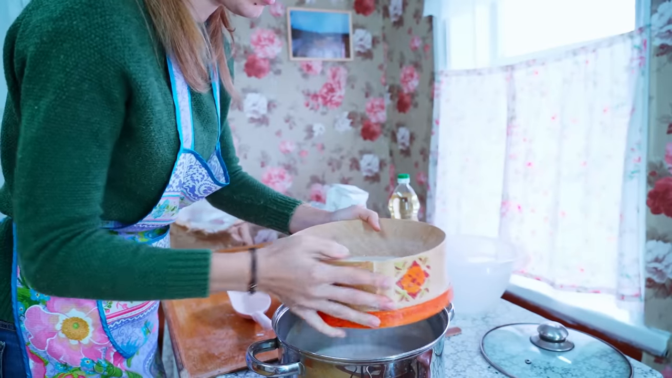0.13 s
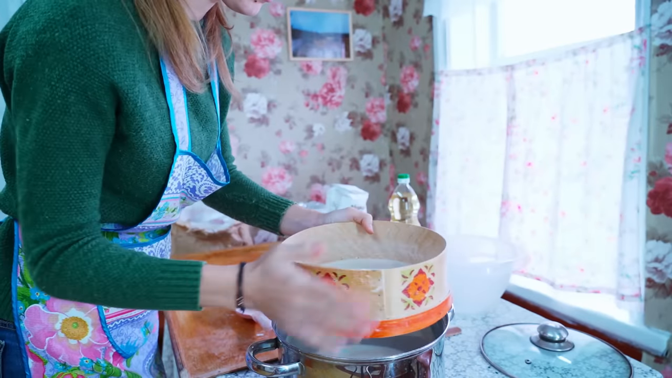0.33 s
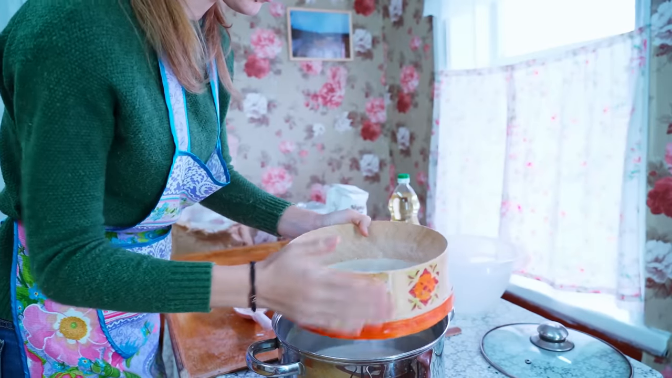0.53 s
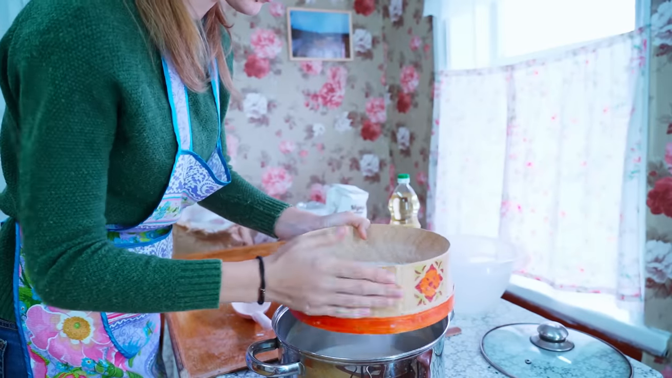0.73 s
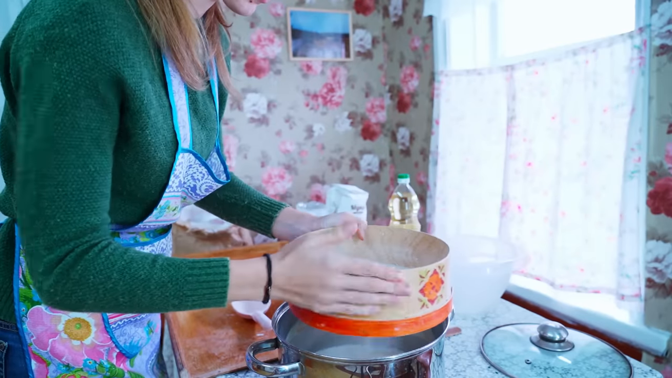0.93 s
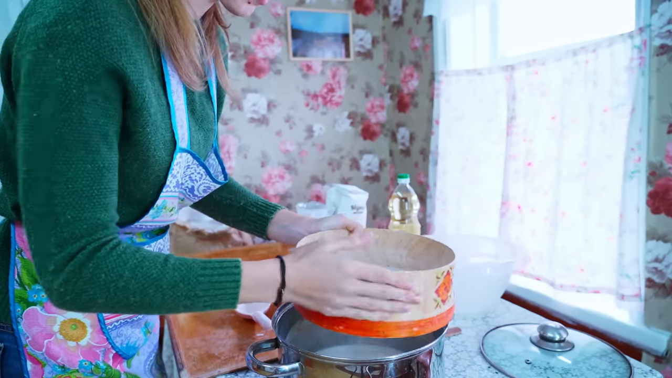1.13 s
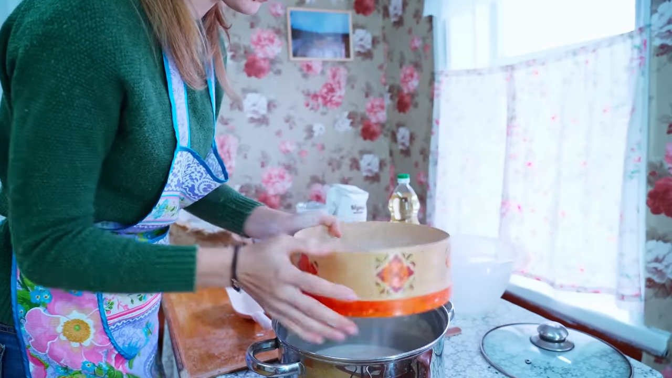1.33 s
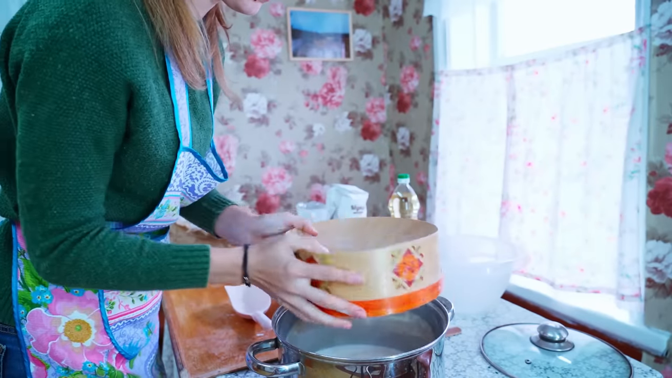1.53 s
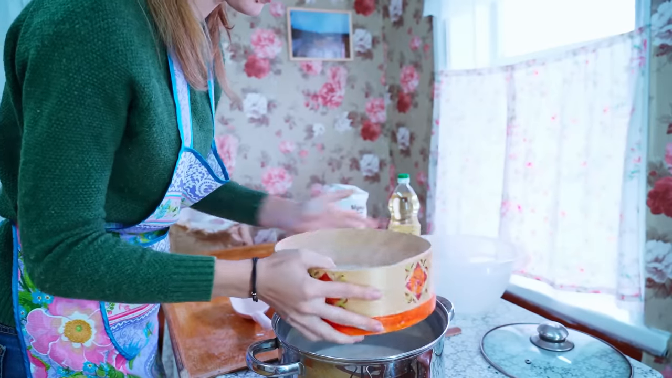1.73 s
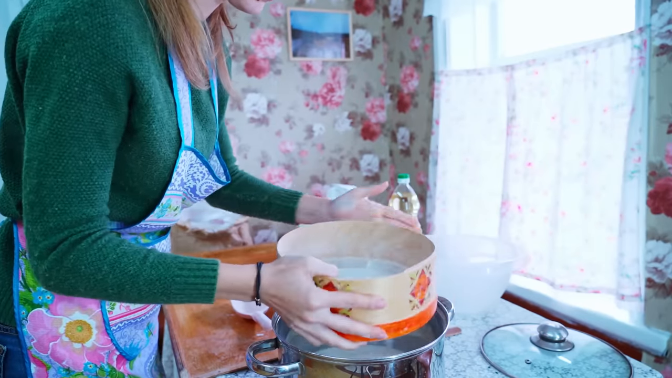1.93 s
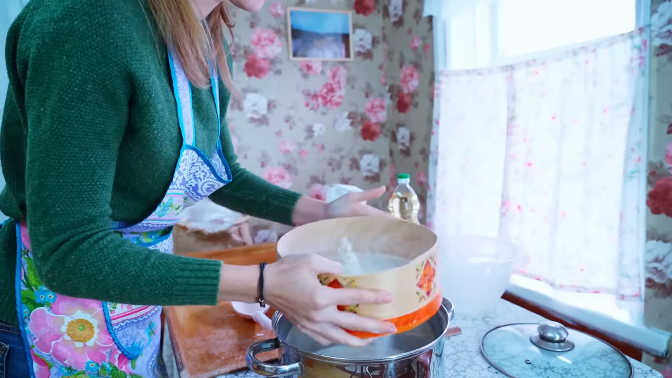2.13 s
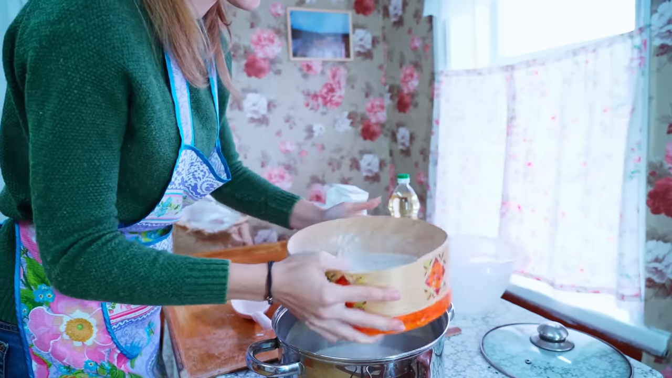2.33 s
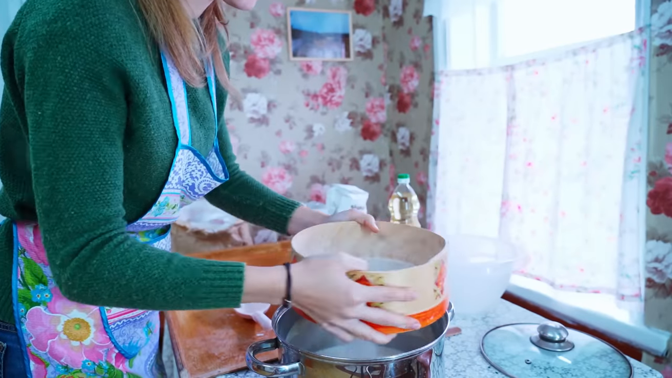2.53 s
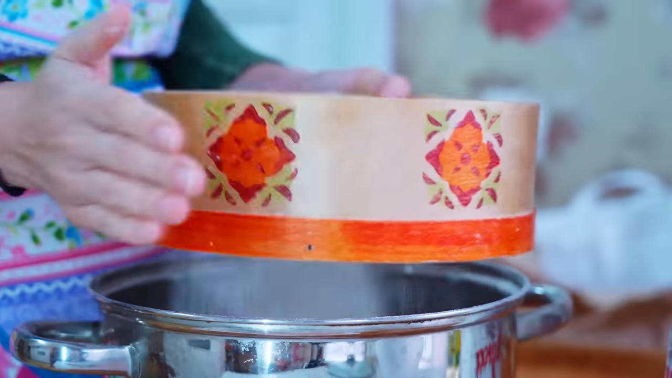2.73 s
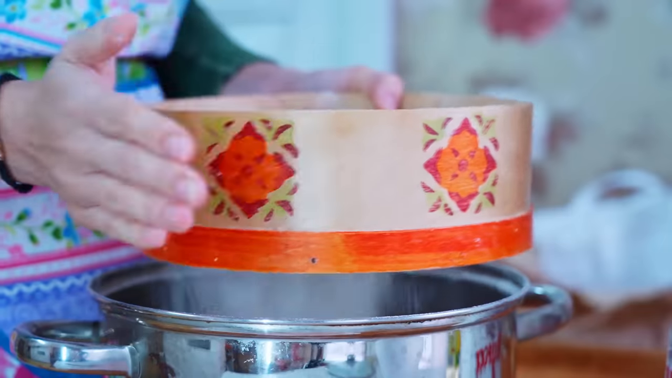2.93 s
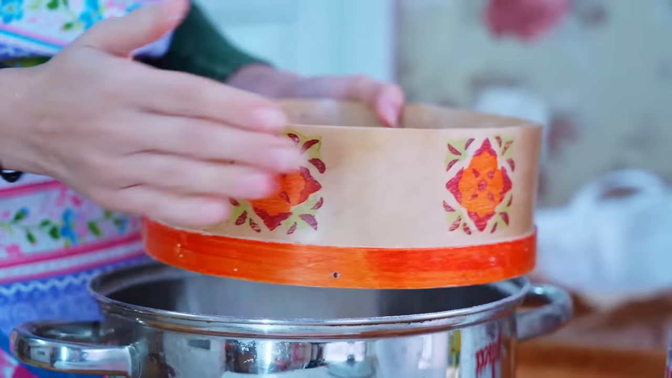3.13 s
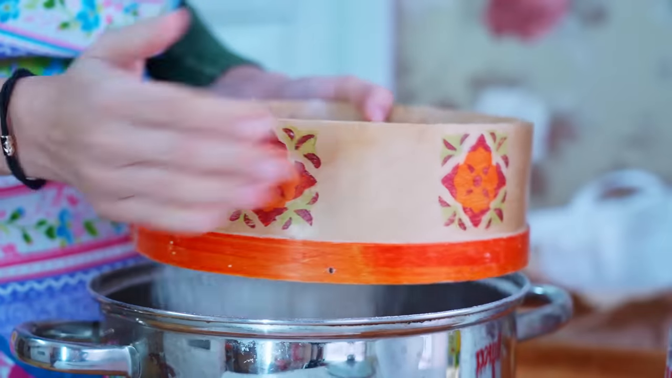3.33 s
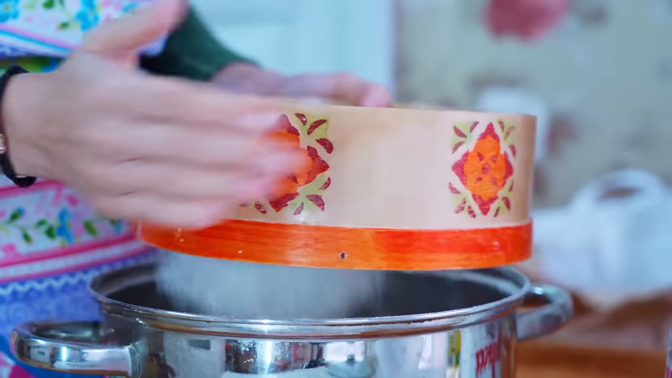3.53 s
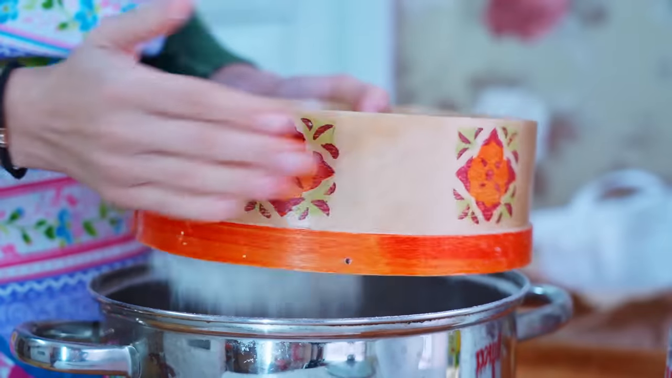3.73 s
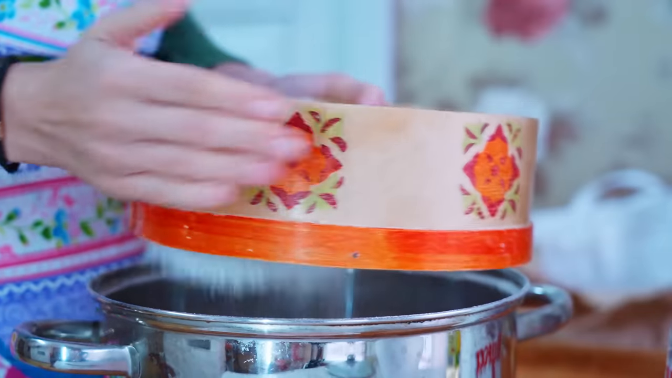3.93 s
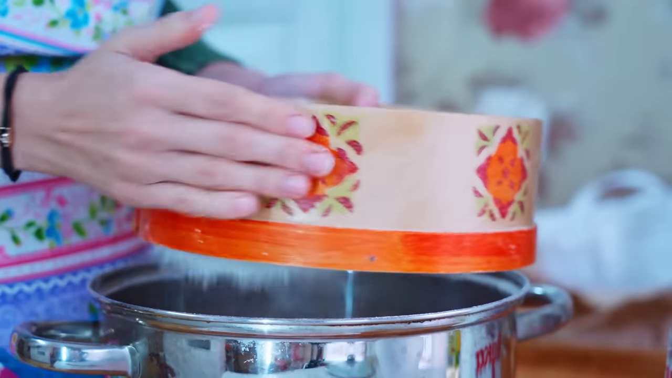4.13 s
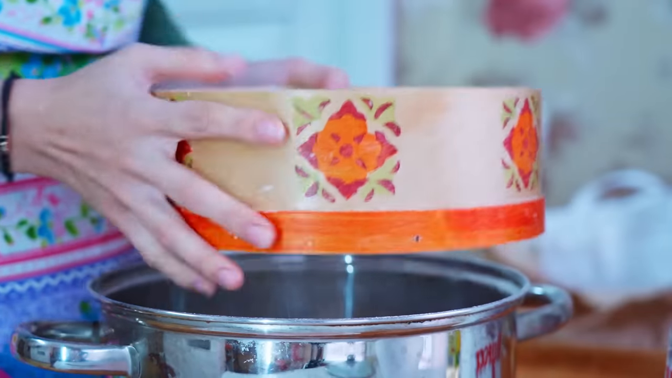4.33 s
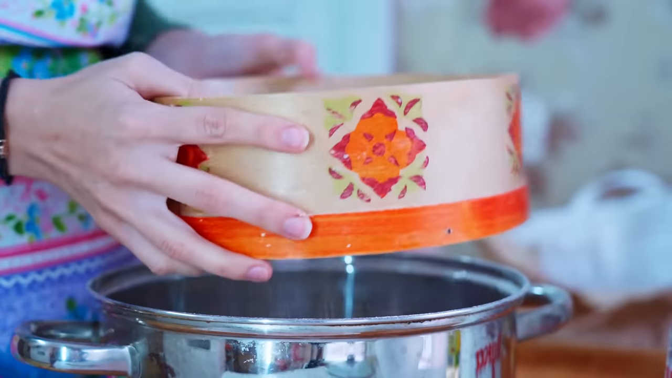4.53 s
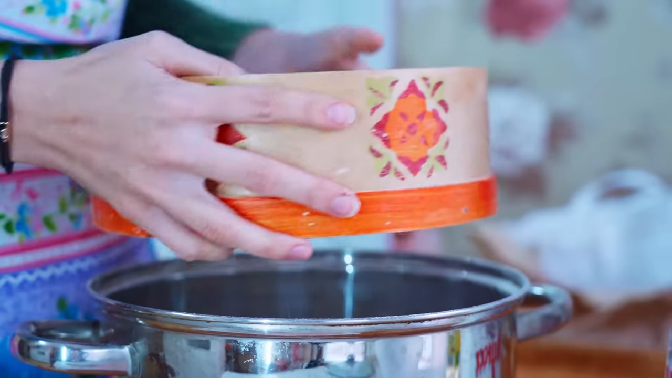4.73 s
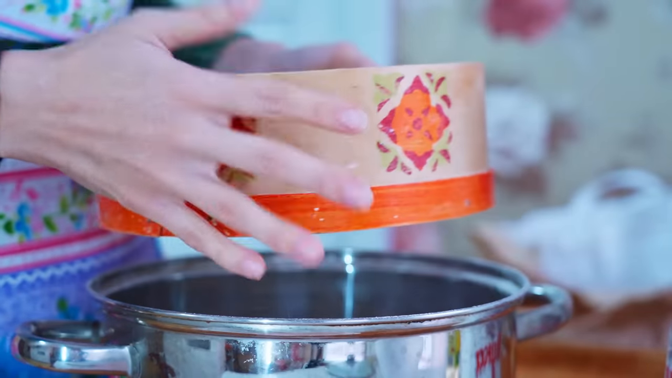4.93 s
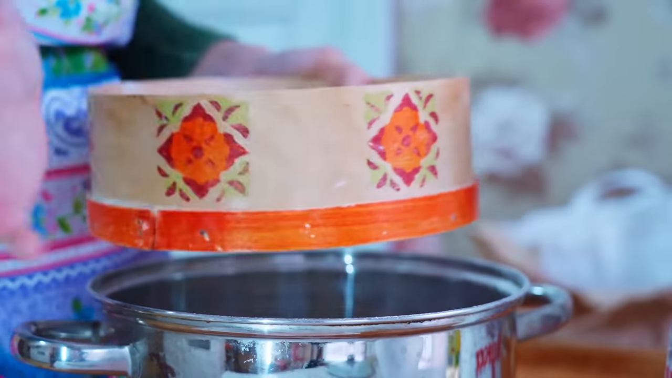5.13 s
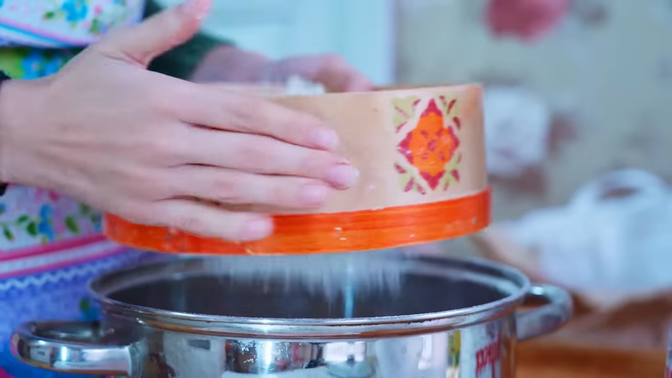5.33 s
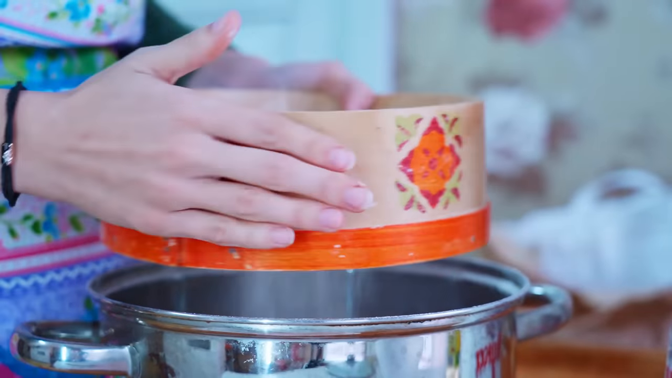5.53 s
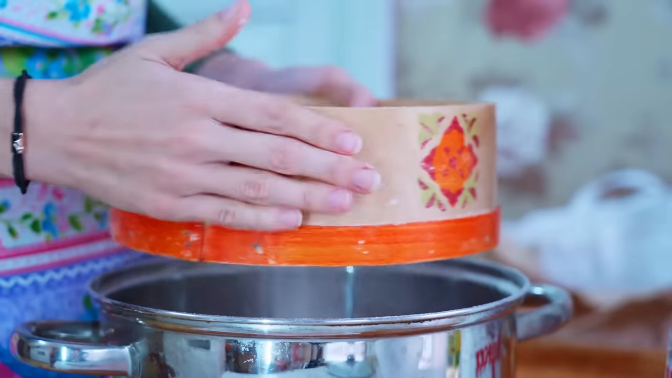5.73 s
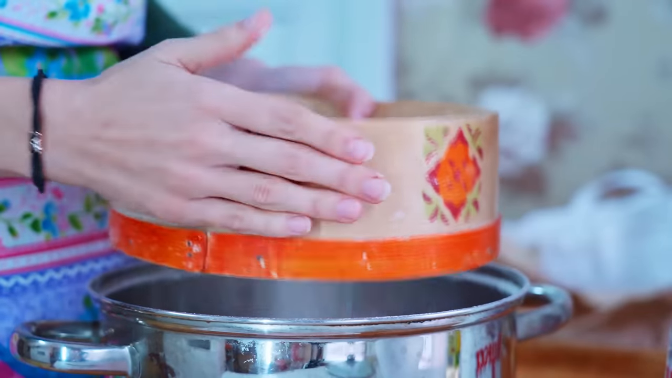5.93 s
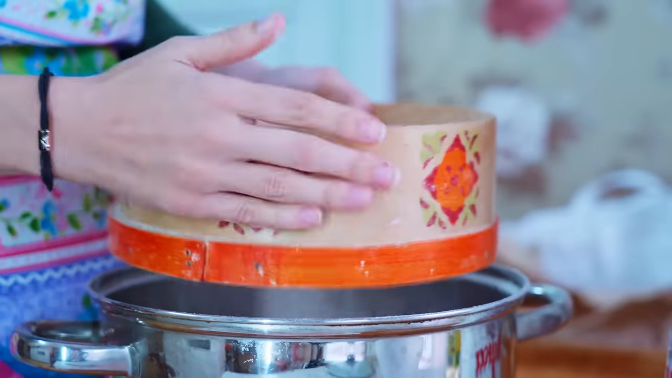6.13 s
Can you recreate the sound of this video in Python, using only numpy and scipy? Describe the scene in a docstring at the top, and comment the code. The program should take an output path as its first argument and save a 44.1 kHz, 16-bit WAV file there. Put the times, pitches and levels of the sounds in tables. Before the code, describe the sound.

A hand pats the wooden hoop of a flour sieve in three quick, even runs, hollow dry knocks in a small lively kitchen.

```python
"""A hand pats the wooden hoop of a flour sieve over a steel pot in a small kitchen, about five times a second in three runs.
Each pat is noise shaped by the contact of the hand: a clack of the hoop, a hollow pock of air under the palm,
a snap of skin with a short hiss of flour, and ringing modes of the wood and the loaded mesh.
During and between the runs skin rubs on the wood, fingertips tick and flour flops on the mesh.
Dense echoes of table and walls surround it all, over a faint rumble and hiss of the room."""
import sys
import numpy as np
from scipy import signal
from scipy.fft import rfft, irfft
from scipy.io import wavfile

SR = 44100
rng = np.random.default_rng(int(sys.argv[2]) if len(sys.argv) > 2 else 0)


def master(y):
    """Save y as 16-bit WAV."""
    cut = np.clip(np.atleast_2d(y).T, -1, 1)
    pcm = np.round(cut * 32767)  # scale
    wavfile.write(sys.argv[1], SR, pcm.astype(np.int16))


N = 272538  # length of the scene in samples
AGE = np.arange(SR // 2) / SR  # seconds since the start of a blow
SIZE = 2 ** 15  # samples in a filter design

FIRM_DB = -21.5  # strength of a firm pat
BASS_FOLLOWS = 0.76  # dB of bass per dB of strength: a softer pat loses less bass than clack
# Each pair: flat fingers, hollow palm. The palm traps air, lands slowly, pushes the mesh and damps the wood.
POCK_DB = (-15.5, -1)  # against the strength
BOOM_DB = (-47, -37.5)  # at a firm pat
ECHO_DB = (4, -4.5)

# Pats of the hand on the hoop. Each row: start in seconds, strength in dB, cupping from 0 (flat fingers)
# to 1 (hollow palm), skin snap in dB against the strength, pitch of the pock in Hz, pitch of the clack in Hz.
HAND_PATS = [(0.032, -38, 0.72, -13, 363, 3000), (0.4104, -23, 0.66, -6, 507, 1890),
             (0.596, -21.5, 0.48, -4, 458, 2900), (0.7694, -20, .05, -8, 570, 1560),
             (0.9502, -18.5, 0.34, -10, 328, 2130), (1.137, -20, 0.22, -3.5, 457, 2470),
             (1.873, -29.5, 0.26, -6, 785, 2660), (2.0472, -27.5, 0.51, 0, 330, 3350),
             (2.218, -23.5, 0.36, -4.5, 414, 3020), (2.3914, -23.5, 0.5, -4.5, 490, 2640),
             (2.635, -22, 0.073, -5, 404, 2500), (2.8406, -21, 0.48, -6, 620, 2090),
             (3.0458, -20, 0.44, -14.5, 630, 2500), (3.267, -21.5, 0.46, -8, 468, 1890),
             (3.4684, -21, 0.57, -7.5, 640, 2050), (3.682, -20, 0.78, -9, 420, 1900),
             (3.8896, -21.5, 0.72, -4.5, 392, 1490), (4.1083, -21, 0.51, -11, 625, 2300),
             (4.373, -40, 0.37, -5.5, 380, 2500), (5.3045, -19, 0.39, -4.5, 407, 2500),
             (5.5363, -24, 0.57, -7.5, 435, 2100), (5.7453, -23, 0.53, -6, 413, 1380),
             (5.9597, -23.5, 1, -8, 400, 2000), (6.1675, -21, 0.64, -11, 442, 2320)]
# Thump of the loaded mesh at a firm pat, as it changes along the scene. Each row: time in seconds, level in dB.
MESH_THUMP_LEVEL = [(0, -28.5), (.42, -25.5), (.8, -36), (1.15, -38), (2.07, -30), (3.05, -40), (3.7, -43),
                    (4.1, -36), (5.3, -33.5), (5.95, -31), (6.17, -37.5)]


def pats():
    """The hand strikes the hoop: the wood clacks, trapped air pocks, the mesh thumps and flour is jolted across it."""
    out = np.zeros((2, N))
    snap_colour = causal(SKIN_SNAP_COLOUR)
    for start_s, clack_db, cupping, snap_db, pock_hz, clack_hz in HAND_PATS:
        pock_db = clack_db + by_hand(POCK_DB, cupping)
        bass_db = BASS_FOLLOWS * (clack_db - FIRM_DB)
        thump_db = bass_db + np.interp(start_s, *np.transpose(MESH_THUMP_LEVEL))
        boom_db = bass_db + by_hand(BOOM_DB, cupping)

        force = blow(clack_db, cupping)
        room = from_db(by_hand(ECHO_DB, cupping)) * echoes()
        # the blow is so brief that the room answers it as one click
        tail = room * np.sqrt(np.sum(force ** 2) / 2)

        hollow = from_db(pock_db) * pock(force, tail, pock_hz)
        wood = from_db(clack_db) * clack(force, tail, clack_hz, cupping)
        skin = from_db(clack_db + snap_db) * snap(force, tail, snap_colour)
        add(out, start_s, hollow + wood + skin)
        add(out, start_s, in_room(hoop(pock_db, pock_hz, clack_db, clack_hz), room))
        add(out, start_s, from_db(thump_db) * unit_start(in_room(thud(), room)))
        add(out, start_s, from_db(boom_db) * boom())
    return out


# Settings of the contact; the pair is for flat fingers and a hollow palm.
CONTACT_S = (0.0012, 0.0072)  # decay of the push at a firm pat
CONTACT_DOUBLES_DB = 11  # a pat this much softer lands twice as slowly
FINGERS_LAG_CONTACTS, FINGERS_DB = 0.69, -15.5  # lag behind the palm in contact times, level against it
CRACK_DB, CRACK_FOLLOWS = 12, .9  # crack at a firm pat against the palm's noise, dB per dB of strength


def blow(clack_db, cupping, settle_db=-19, settle_s=.016, crack_s=.0004):
    """Skin meets wood with one sharp crack, palm and fingers land in turn, then the hand settles."""
    softer_db = FIRM_DB - clack_db
    contact_s = by_hand(CONTACT_S, cupping) * 2 ** (softer_db / CONTACT_DOUBLES_DB)
    lag_s = FINGERS_LAG_CONTACTS * contact_s
    palm = np.exp(-AGE / contact_s)
    fingers = from_db(FINGERS_DB) * (AGE >= lag_s) * np.exp(-np.abs(AGE - lag_s) / contact_s)
    settle = from_db(settle_db) * np.exp(-AGE / settle_s)
    push = stereo_noise(size=len(AGE)) * (palm + fingers + settle)
    crack = signal.unit_impulse(len(AGE), int(crack_s * SR))
    return push + from_db(CRACK_DB - CRACK_FOLLOWS * softer_db) * crack


# Colour of the clack of the wood. Each row: frequency in Hz, relative level in dB.
CLACK_COLOUR = [(60, -101.5), (300, -92), (700, -41), (1050, -5.5), (1400, -3.5), (2300, 0), (3200, -2.5),
                (4300, -1.5), (6000, -12), (12000, -29)]
RESONANCE_DB = (6.5, -5)  # of the struck spot: flat fingers, hollow palm
SPOT_IN_ECHO_DB = -3  # the struck spot faces the microphone, so its resonance is weaker in the echoes


def clack(force, tail, clack_hz, cupping, follow=0.057):
    """The struck spot of the hoop favours one pitch and pulls the whole colour of the wood slightly along."""
    colour = shifted(CLACK_COLOUR, (clack_hz / 2300) ** follow)
    direct = through(force * from_db([[-1.4], [1.1]]), colour)  # left, right
    echoed = through(tail, colour)
    knock = resonate(direct + from_db(SPOT_IN_ECHO_DB) * echoed, clack_hz, q=3.75)
    return unit_start(direct + echoed + from_db(by_hand(RESONANCE_DB, cupping)) * knock)


# Colour of the hollow pock. Each row: frequency in Hz, relative level in dB.
POCK_COLOUR = [(40, -64), (120, -52), (260, 3.5), (400, 8), (650, 3.5), (900, 5.5), (1400, -10),
               (4000, -54)]


def pock(force, tail, pock_hz, follow=0.052):
    """The air trapped under the palm rings briefly and pulls the whole colour of the pock slightly along."""
    colour = shifted(POCK_COLOUR, (pock_hz / 450) ** follow)
    push = through(force + 0.84 * tail, colour)
    return unit_start(push + 2.4 * resonate(push, pock_hz, q=7.0))


# Colour of skin snap and flour hiss, used by pats and ticks. Each row: frequency in Hz, relative level in dB.
SKIN_SNAP_COLOUR = [(100, -70), (1000, -19.5), (3200, -10), (4800, 4), (6500, 0), (8500, -5.5),
                    (11000, -11.5), (16000, -22.5)]


def snap(force, tail, colour, flour_db=-31, flour_s=0.083, grain_db=2.2):
    """Skin snaps on the wood, then jolted flour hisses: noise with a grainy level that dies away."""
    grains = from_db(flour_db + grain_db * rng.standard_normal(len(AGE)))
    flour = stereo_noise(size=len(AGE)) * grains * np.exp(-AGE / flour_s)
    skin = force * from_db([[-4.0], [2.2]])  # left, right
    return unit_start(through(skin + tail + flour, colour)) * from_db([[-.6], [.4]])


# Modes of the wooden hoop, damped by the hands. Each row: frequency in Hz, relative level in dB.
HOOP_MODES = [(352, -6), (418, 0), (490, -3), (618, 1), (823, -4), (952, -6), (1195, -1), (1395, 2),
              (1662, 0), (1855, 1), (2040, 0), (2330, -1), (2700, -2), (3201, -1), (3379, -1)]
HOOP_T60_S = .055


def hoop(pock_db, pock_hz, clack_db, clack_hz, per_octave_db=8, low_db=-13, high_db=-16.5):
    """Low modes follow the palm's push, high ones the sharp contact; those near the pitch of the spot ring most."""
    modes = []
    for hz, db in HOOP_MODES:
        if hz < 900:
            drive_db, spot_hz = pock_db + low_db, pock_hz
        else:
            drive_db, spot_hz = clack_db + high_db, clack_hz
        distance_octaves = abs(np.log2(hz / spot_hz))
        modes.append((hz, db + drive_db - per_octave_db * distance_octaves, HOOP_T60_S))
    return struck(modes, scatter_db=7.5)


# Higher modes of the mesh. Each row: frequency in Hz, relative level in dB, t60 in seconds.
MESH_MODES = [(117.6, -10.5, 0.19), (162, -3.5, 0.13), (203.5, 1.5, 0.055), (274, -2, 0.033)]


def thud(cut_hz=105):
    """The higher mesh modes push little air at low pitch."""
    low_cut = signal.butter(2, cut_hz, "high", fs=SR, output="sos")
    return signal.sosfilt(low_cut, struck(MESH_MODES, scatter_db=3.0))


# Lowest mode of the mesh. Each row: frequency in Hz, relative level in dB, t60 in seconds.
MESH_BOOM = [(74.8, 0, 0.3)]


def boom(rise_s=0.0007):
    """The whole loaded mesh swings as a drumhead."""
    return unit_start(struck(MESH_BOOM, scatter_db=.6) * (1 - np.exp(-AGE / rise_s)))


# The heap of flour flops back on the mesh. Each row: start in seconds, level in dB.
FLOUR_FLOPS = [(0.44, -41), (2.288, -59), (4.258, -50), (4.317, -53), (5.45, -46), (5.69, -46)]


def flops(rise_s=0.0066):
    """Flour landing on the mesh rings its higher modes with a soft onset."""
    out = np.zeros((2, N))
    for start_s, db in FLOUR_FLOPS:
        soft = thud() * (1 - np.exp(-AGE / rise_s))
        add(out, start_s, from_db(db) * unit_start(soft))
    return out


# Skin sliding on wood. Each row: peak in seconds, length in seconds, level in dB, treble lift in dB.
SKIN_SLIDES = [(0.057, 0.049, -44.5, -23), (0.148, 0.1, -45, -5), (0.697, .032, -36.5, 26),
               (1.49, 0.13, -43, -3.5), (1.672, 0.083, -51.5, 21), (2.511, 0.14, -50, -4),
               (4.541, .06, -49, 1), (4.763, .022, -43.5, -17), (4.847, 0.028, -51.5, -5),
               (4.909, 0.042, -48, -2)]
# Colour of the rubbing. Each row: frequency in Hz, relative level in dB.
SLIDE_COLOUR = [(200, -13), (900, -17), (1600, -11.5), (2400, -5.5), (3600, -8), (6500, -8.5),
                (10000, -14.5), (16000, -21.5)]
SLIDE_SWELL_SHARE = 0.58  # of the length; the rest is the fade
TOUCH_RING_HZ, TOUCH_RING_Q = 2410, 7.9  # the hoop sings faintly under a light touch


def slides(catch_db=3.5, catches_per_s=160, ring_db=-3):
    """Floury skin rubs on the wood, catching and slipping at random; each slide swells and fades."""
    t = np.arange(N) / SR
    catching = np.interp(t * catches_per_s, np.arange(SIZE), rng.standard_normal(SIZE))
    rub = through(stereo_noise(size=N) * from_db(catch_db * catching), causal(SLIDE_COLOUR))
    rub = rub + from_db(ring_db) * resonate(rub, TOUCH_RING_HZ, q=TOUCH_RING_Q)
    treble = signal.sosfilt(signal.butter(1, 6000, "high", fs=SR, output="sos"), rub)
    out = np.zeros((2, N))
    for peak_s, length_s, db, lift_db in SKIN_SLIDES:
        sound = rub + (from_db(lift_db) - 1) * treble
        share = np.where(t < peak_s, SLIDE_SWELL_SHARE, 1 - SLIDE_SWELL_SHARE)
        envelope = np.exp(-np.abs(t - peak_s) / (length_s * share))
        out += from_db(db) * sound / sound.std() * envelope
    return out * from_db([[-1.2], [1.0]])  # left, right


# A fingertip ticks on the wood. Each row: start in seconds, level in dB.
FINGER_TICKS = [(3.024, -56), (3.451, -54), (4.231, -54), (4.263, -63), (5.027, -50.5), (5.16, -65)]


def ticks(contact_s=0.0018, ring_db=10, body_db=-11):
    """A fingertip meets the wood: mostly the snap of the skin, with a trace of the hoop."""
    out = np.zeros((2, N))
    snap_colour, wood_colour = causal(SKIN_SNAP_COLOUR), causal(CLACK_COLOUR)
    for start_s, db in FINGER_TICKS:
        force = stereo_noise(size=len(AGE)) * np.exp(-AGE / contact_s)
        wood = through(force, wood_colour)
        wood = wood + from_db(ring_db) * resonate(wood, TOUCH_RING_HZ, q=TOUCH_RING_Q)
        tick = through(force, snap_colour) + from_db(body_db) * wood
        add(out, start_s, from_db(db) * unit_start(tick))
    return out


# Echoes of the kitchen. Each row: frequency in Hz, t60 in seconds, echo energy in dB.
KITCHEN_ECHO = [(70, 0.3, -5), (189, 0.37, -5.5), (485, 0.24, -4), (1130, 0.3, 0.5), (2080, 0.33, -3),
                (4700, 0.26, -1), (7800, 0.22, 1.5), (15000, 0.19, 1.5)]
# Stereo width of the echoes. Each row: frequency in Hz, side against mid in dB.
ECHO_SIDE = [(70, -18), (200, -16), (500, -11), (1100, -5), (2200, 0)]


def echoes(build_s=0.001, first_s=0.0016):
    """Dense echoes from table and walls, noise dying band by band, with a new pattern at every call."""
    response = 0
    edges = 45 * 2 ** np.arange(0, 9, .5)  # half-octave bands, Hz
    white = rfft(rng.standard_normal((2, len(AGE))))
    hz = np.fft.rfftfreq(len(AGE), 1 / SR)
    swell = 1 - np.exp(-np.maximum(AGE - first_s, 0) / build_s)
    for low, high in zip(edges, edges[1:]):
        centre = np.sqrt(low * high)
        t60 = at_hz(KITCHEN_ECHO, centre, axis=1)
        db = at_hz(KITCHEN_ECHO, centre, axis=2)
        band = irfft(white * ((hz >= low) & (hz < high)))
        band = band * swell * np.exp(-np.log(1000) * AGE / t60)
        # energy in proportion to the bandwidth
        mid, side = band * np.sqrt((high - low) / SR / np.sum(band ** 2, axis=1, keepdims=True))
        width = from_db(at_hz(ECHO_SIDE, centre))
        stereo = mid + width * side * [[1], [-1]]
        response = response + from_db(db) * np.sqrt(2 / (1 + width ** 2)) * stereo
    return response


def in_room(x, room):
    """A sound followed by its echoes."""
    return x + through(x, room)


# Colour of the background. Each row: frequency in Hz, relative level in dB.
AMBIENCE_COLOUR = [(12, -30), (20, 1.5), (61, 3.5), (98, -8.5), (163, -5.5), (347, -9), (513, -12.5),
                   (574, -12), (660, -11), (738, -19.5), (849, -16), (1120, -17.5), (1330, -18),
                   (11400, -25.5), (16000, -30)]
# Level of the background. Each row: time in seconds, level in dB.
AMBIENCE_LEVEL = [(0, -52.5), (1.8, -52.5), (2.7, -54.5), (4.4, -55.5), (4.7, -57), (5.2, -57),
                  (6.18, -55.5)]


def ambience():
    """Faint rumble and hiss of the room: coloured noise at a slowly varying level."""
    noise = through(stereo_noise(size=N + SIZE), causal(AMBIENCE_COLOUR))[:, SIZE:]
    level_db = np.interp(np.arange(N) / SR, *np.transpose(AMBIENCE_LEVEL))
    return noise / noise.std() * from_db(level_db)


# Stereo width of the noise in all sources. Each row: frequency in Hz, side against mid in dB.
NOISE_SIDE = [(100, -22), (500, -19), (1100, -13), (2200, -6), (4500, -4), (8000, -1), (14000, 0)]


def stereo_noise(size):
    """White noise, alike on both sides in the bass and wide in the treble."""
    mid, side = rng.standard_normal((2, size))
    side = through(side, causal(NOISE_SIDE))
    return mid + side * [[1], [-1]]


def struck(modes, scatter_db):
    """Ring of a set of modes, each a little different in level and pitch at every blow."""
    hz, db, t60 = np.transpose(modes)[:, :, None]
    chance = rng.standard_normal((2, len(modes), 1))
    level = from_db(db + scatter_db * chance[0] - 60 * AGE / t60)
    tone = np.sin(2 * np.pi * hz * (1 + 0.012 * chance[1]) * AGE)
    return np.sum(level * tone, axis=0)


def resonate(x, hz, q):
    """One resonance with gain 1 on top."""
    return signal.lfilter(*signal.iirpeak(hz, q, fs=SR), x)


def by_hand(flat_and_cupped, cupping):
    """A value between that for flat fingers and that for a hollow palm."""
    flat, cupped_palm = flat_and_cupped
    return flat + (cupped_palm - flat) * np.clip(cupping, 0, 1)


def from_db(db):
    """Decibels to gain."""
    return 10 ** (np.asarray(db) / 20)


def at_hz(points, hz, axis=1):
    """Read one column of a table on a log-frequency axis."""
    points = np.array(points)
    return np.interp(np.log(np.maximum(hz, 1)), np.log(points[:, 0]), points[:, axis])


def causal(spectrum):
    """Minimum-phase impulse response with the given colour, by folding the cepstrum."""
    gain = from_db(at_hz(spectrum, np.fft.rfftfreq(SIZE, 1 / SR)))
    cepstrum = irfft(np.log(gain))
    cepstrum[1:SIZE // 2] *= 2
    cepstrum[SIZE // 2 + 1:] = 0
    return irfft(np.exp(rfft(cepstrum)))[:4096]


def shifted(spectrum, ratio):
    """Impulse response with the same colour at a higher or lower pitch."""
    return causal([(hz * ratio, db) for hz, db in spectrum])


def through(x, response):
    """Pass channels through an impulse response."""
    x = np.atleast_2d(x)
    return signal.fftconvolve(x, np.atleast_2d(response), axes=-1)[:, :x.shape[-1]]


def unit_start(x, window_s=.03):
    """Scale a blow to rms 1 over its first moments."""
    return x / np.sqrt(np.mean(x[..., :int(window_s * SR)] ** 2) + 1e-20)


def add(out, start_s, x):
    """Mix a sound in from its start time."""
    i = max(int(round(start_s * SR)), 0)
    out[:, i:i + x.shape[-1]] += x[..., :max(N - i, 0)]


def scene():
    """The pats with their own echoes, the smaller sounds sharing one set of echoes, and the background."""
    return pats() + in_room(flops() + slides() + ticks(), echoes()) + ambience()


def record(dry, top=0.7, low_cut_hz=32, cutoff_hz=16000):
    """The right side is a little louder; the deep bass is cut, the highest peaks are rounded and the top is cut."""
    balanced = dry * from_db([[-.4], [.3]])
    sound = signal.sosfilt(signal.butter(2, low_cut_hz, "high", fs=SR, output="sos"), balanced)
    rounded = top * np.tanh(sound / top)
    return signal.sosfilt(signal.ellip(10, .1, 80, cutoff_hz, fs=SR, output="sos"), rounded)


dry = scene()
out = record(dry)
master(out)
```